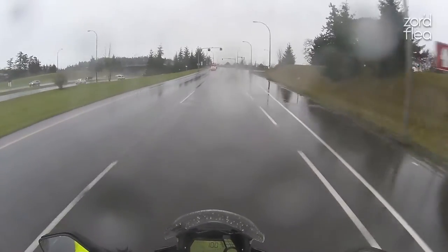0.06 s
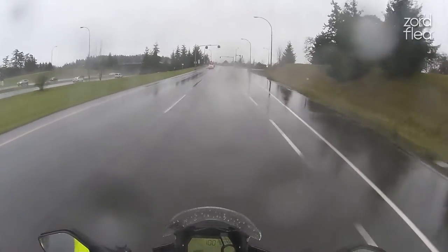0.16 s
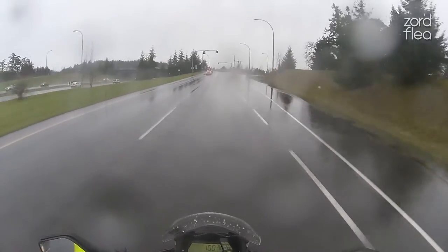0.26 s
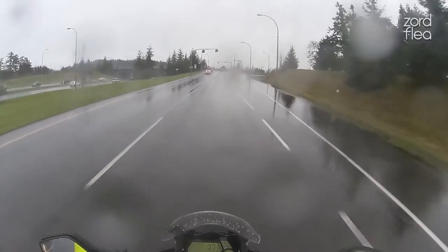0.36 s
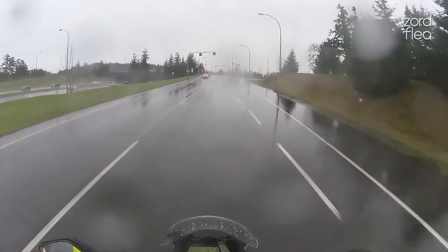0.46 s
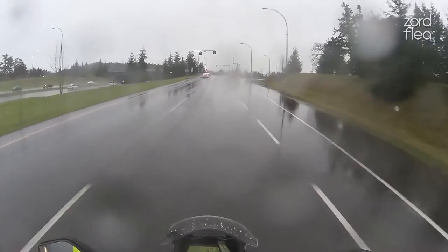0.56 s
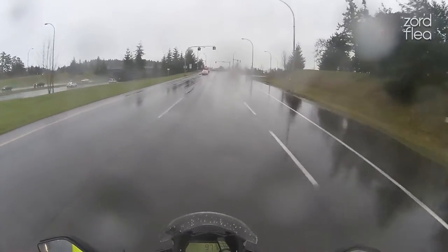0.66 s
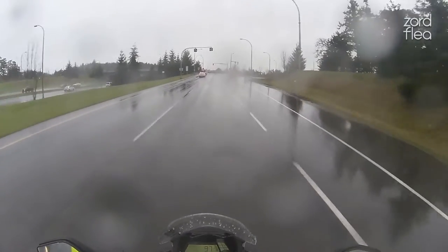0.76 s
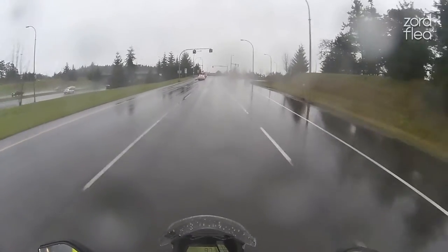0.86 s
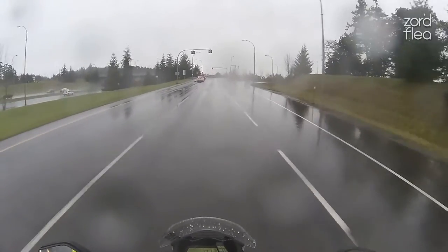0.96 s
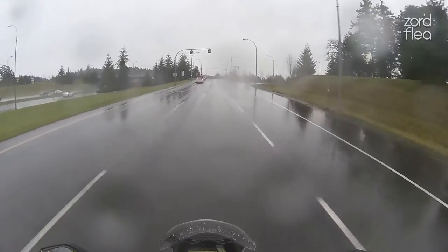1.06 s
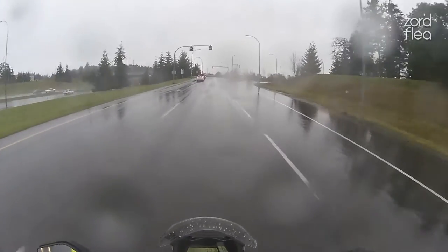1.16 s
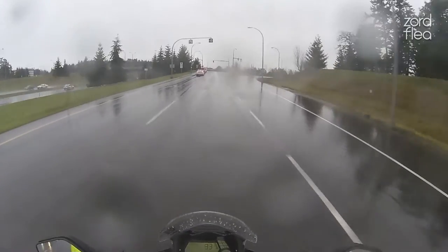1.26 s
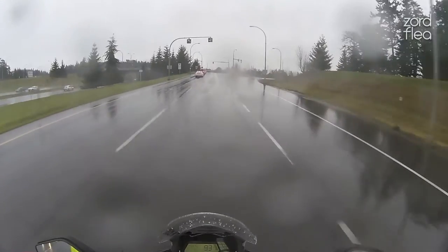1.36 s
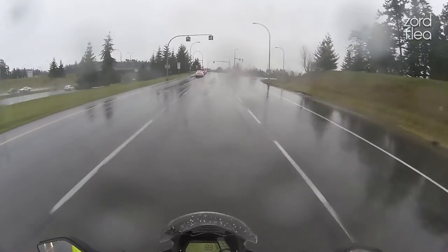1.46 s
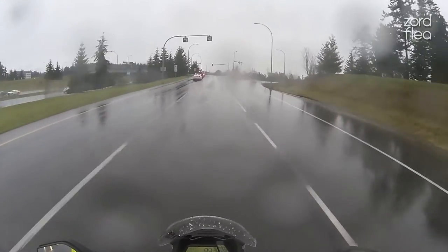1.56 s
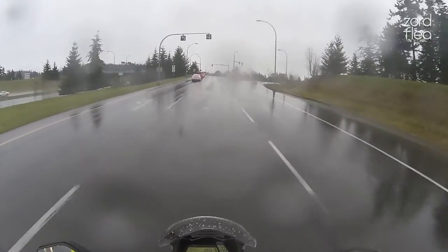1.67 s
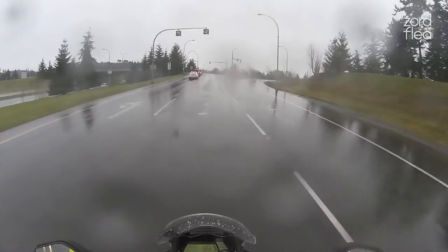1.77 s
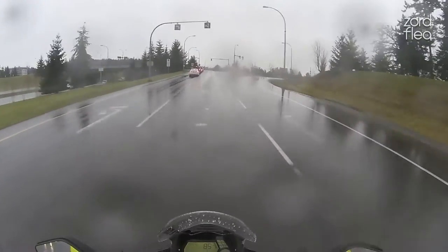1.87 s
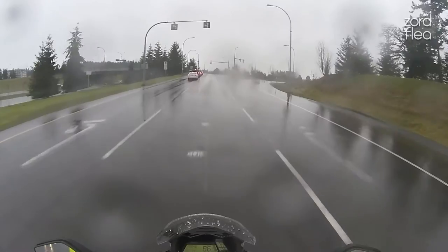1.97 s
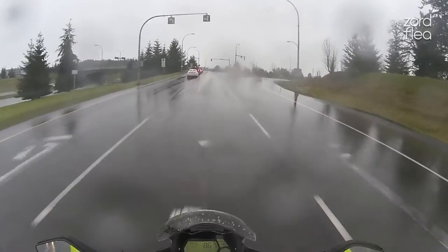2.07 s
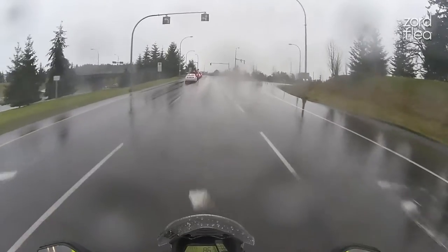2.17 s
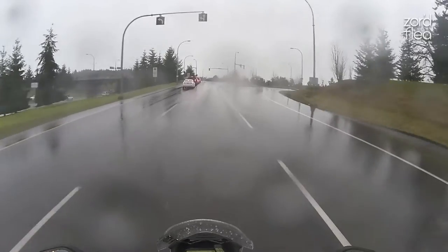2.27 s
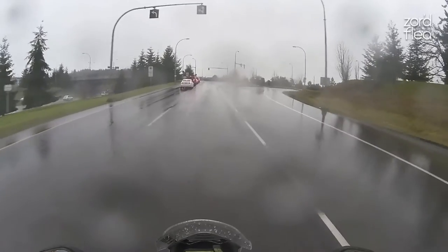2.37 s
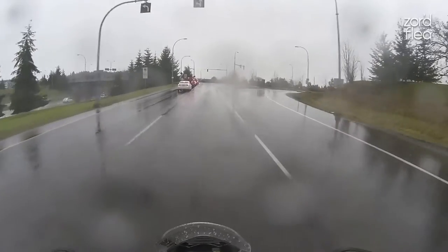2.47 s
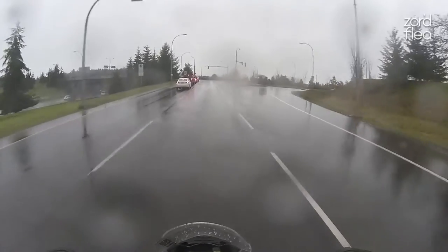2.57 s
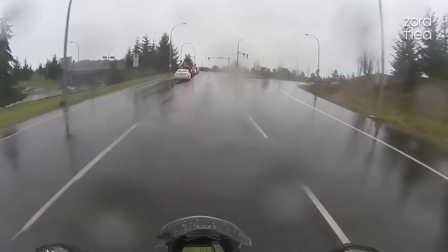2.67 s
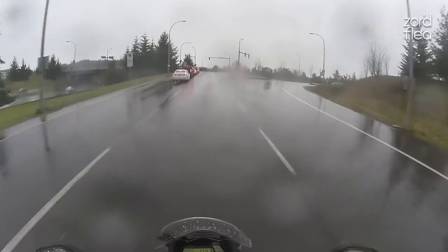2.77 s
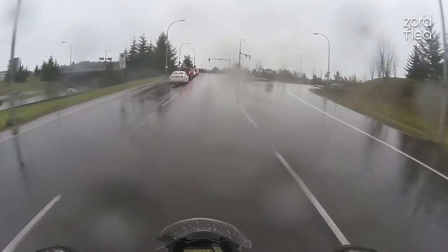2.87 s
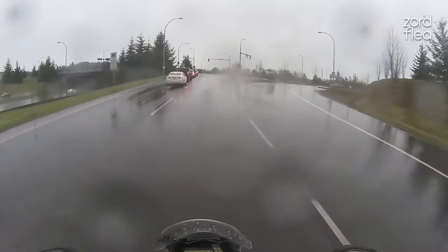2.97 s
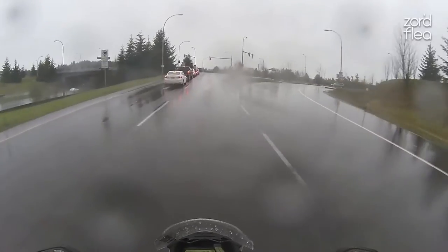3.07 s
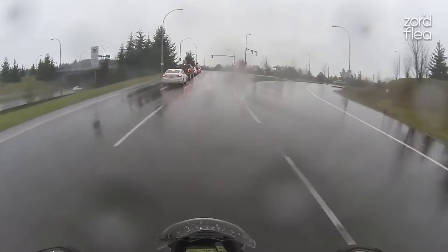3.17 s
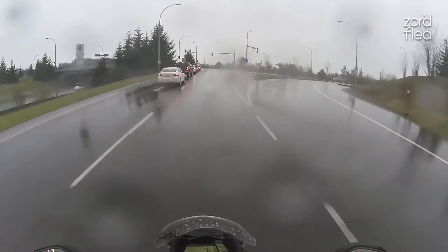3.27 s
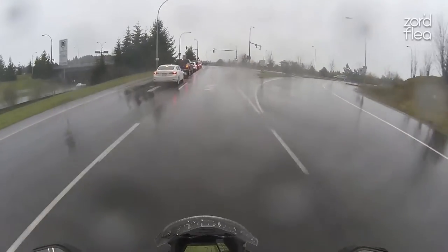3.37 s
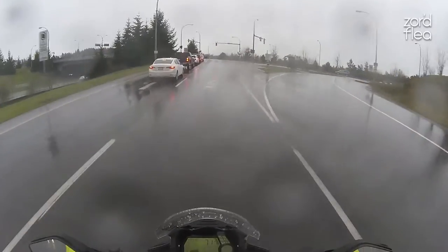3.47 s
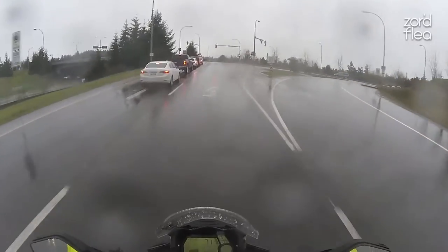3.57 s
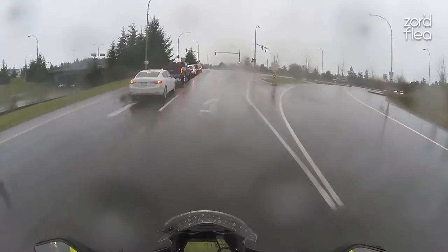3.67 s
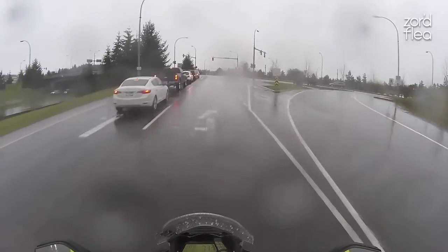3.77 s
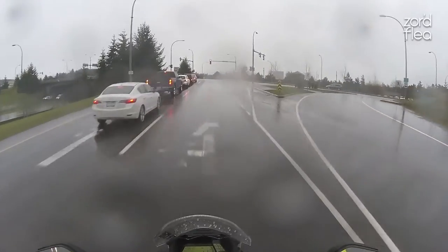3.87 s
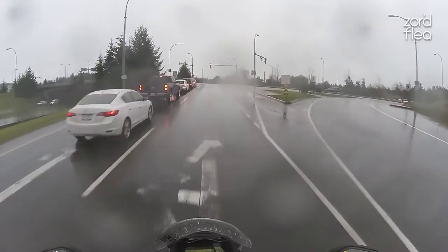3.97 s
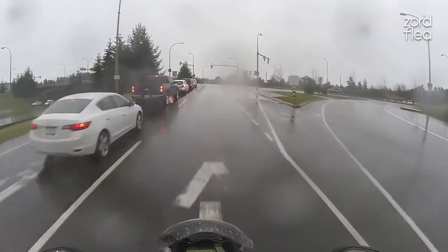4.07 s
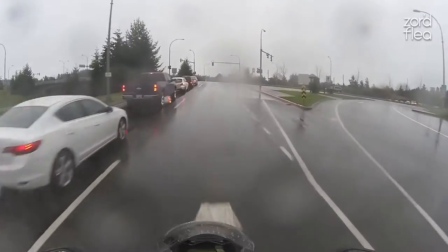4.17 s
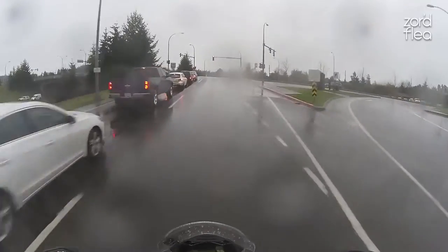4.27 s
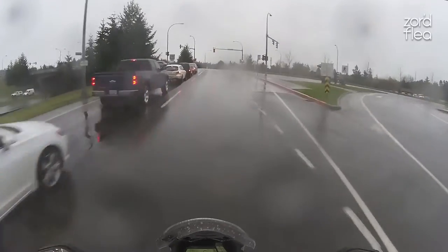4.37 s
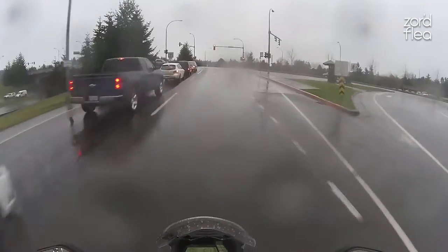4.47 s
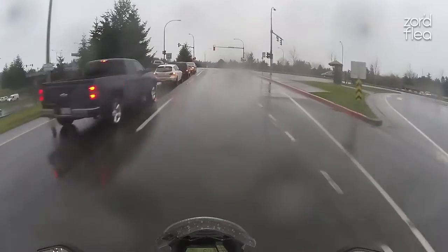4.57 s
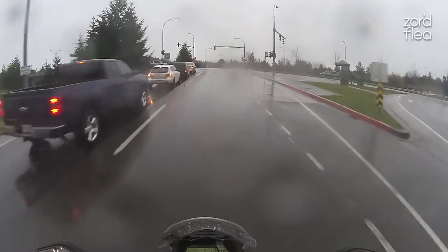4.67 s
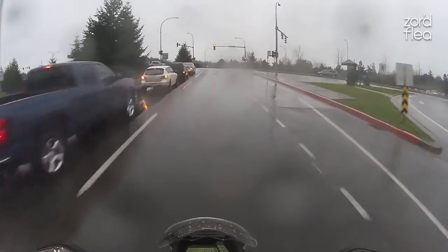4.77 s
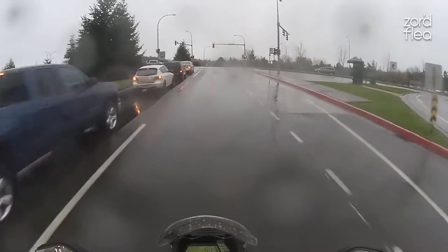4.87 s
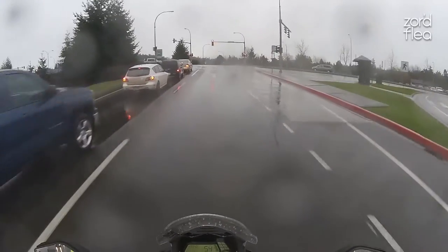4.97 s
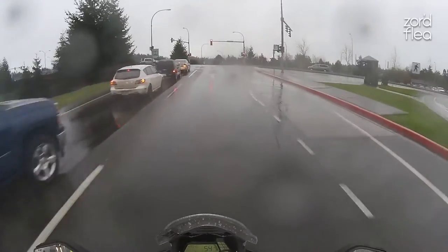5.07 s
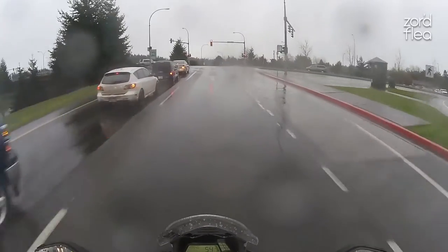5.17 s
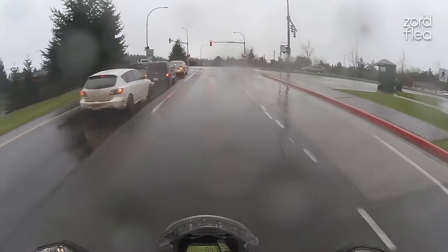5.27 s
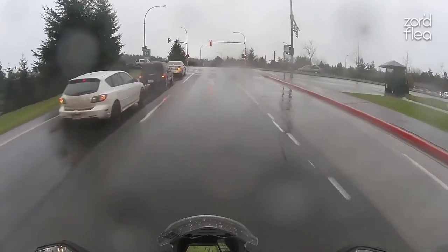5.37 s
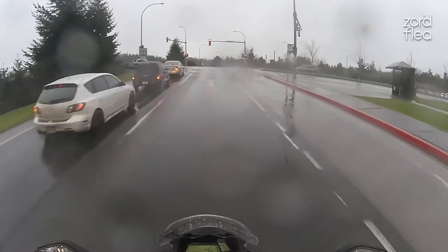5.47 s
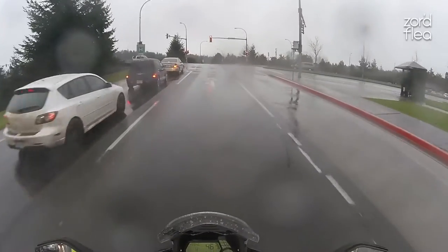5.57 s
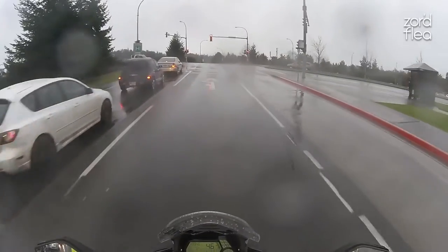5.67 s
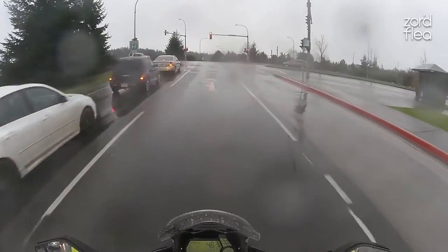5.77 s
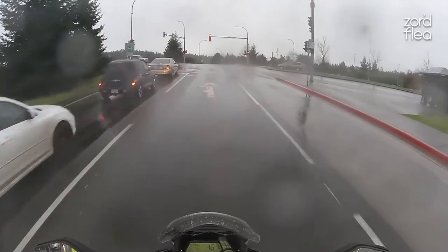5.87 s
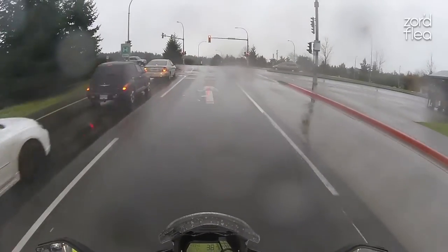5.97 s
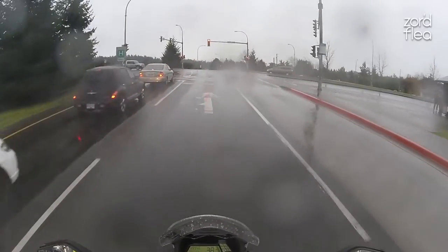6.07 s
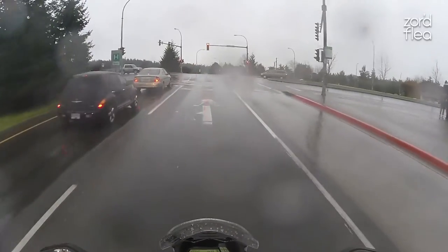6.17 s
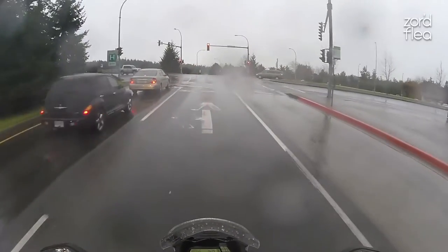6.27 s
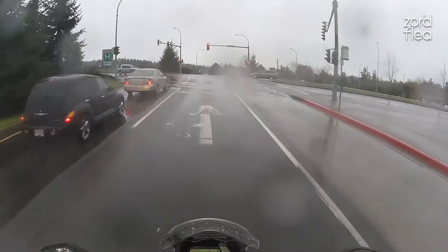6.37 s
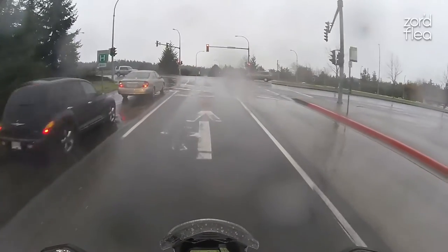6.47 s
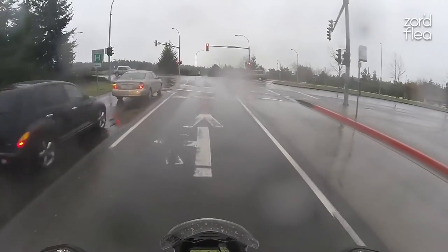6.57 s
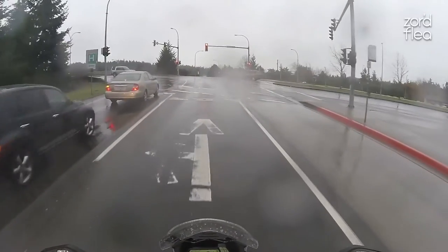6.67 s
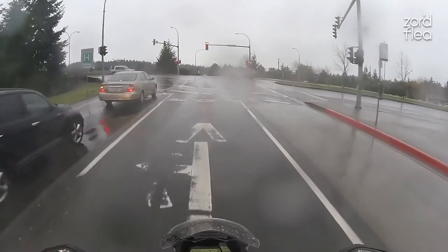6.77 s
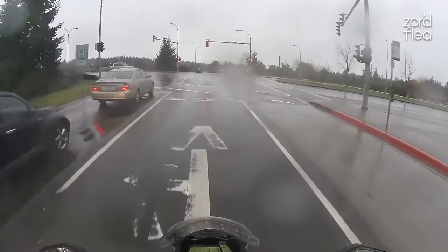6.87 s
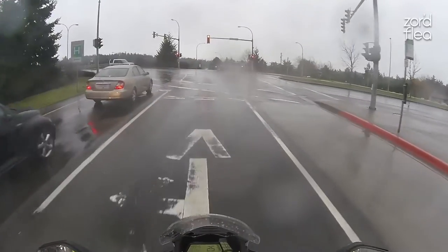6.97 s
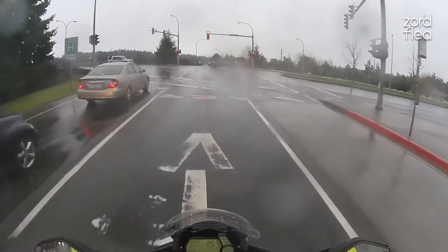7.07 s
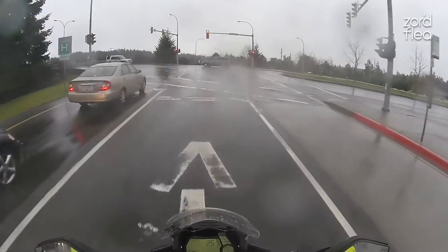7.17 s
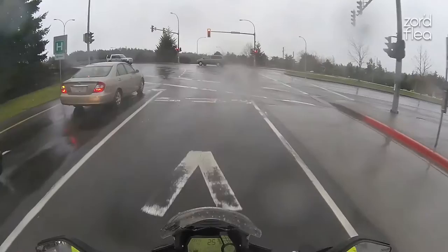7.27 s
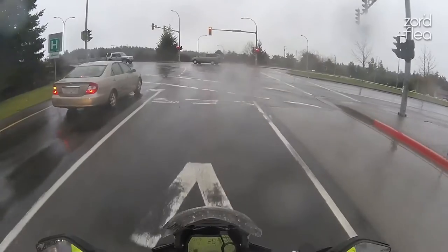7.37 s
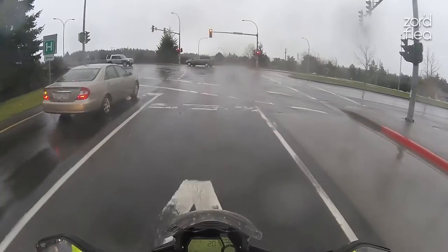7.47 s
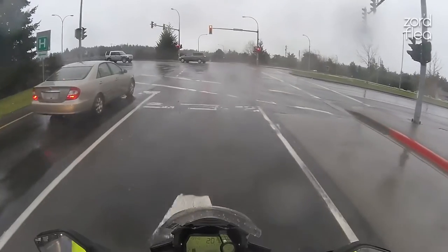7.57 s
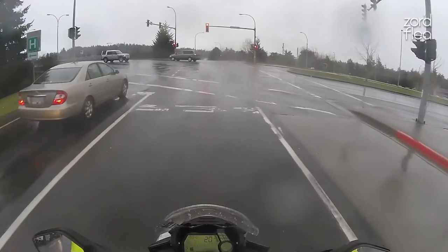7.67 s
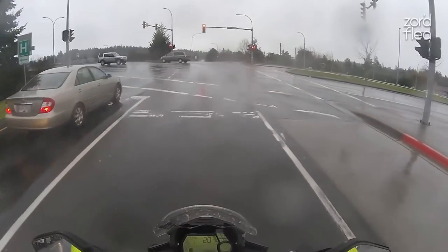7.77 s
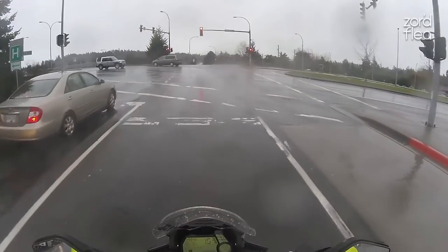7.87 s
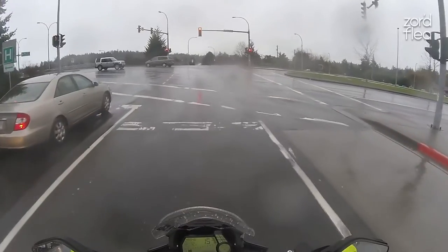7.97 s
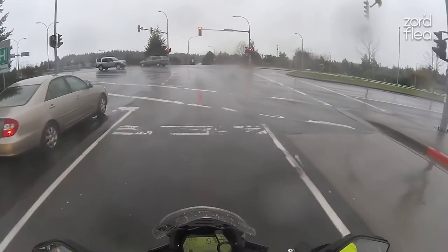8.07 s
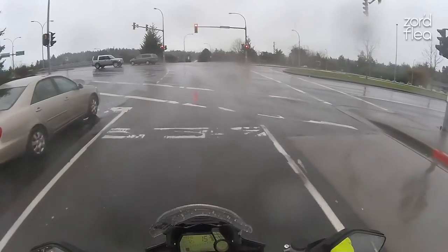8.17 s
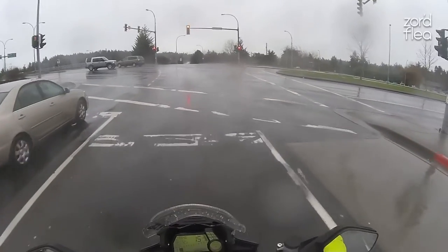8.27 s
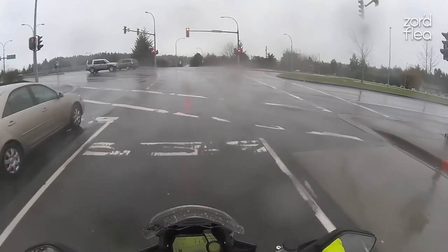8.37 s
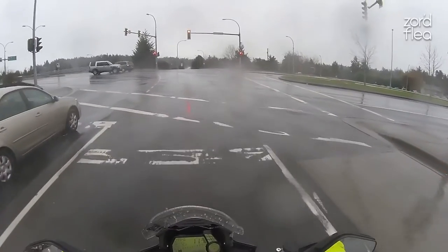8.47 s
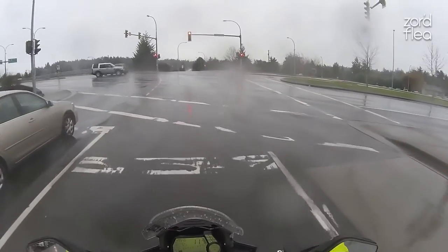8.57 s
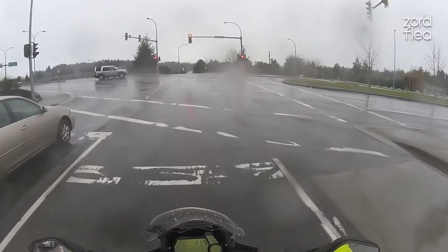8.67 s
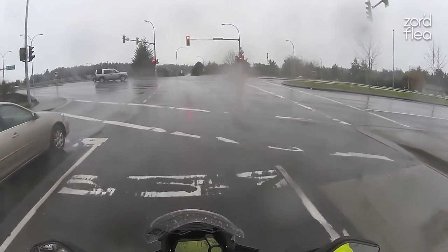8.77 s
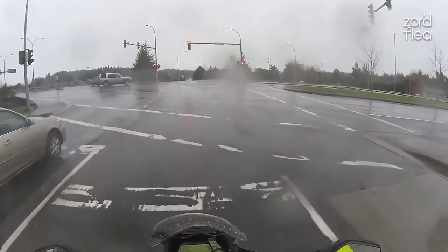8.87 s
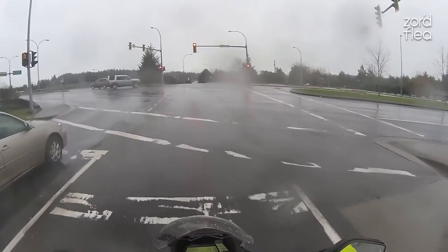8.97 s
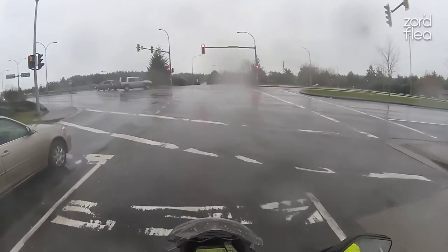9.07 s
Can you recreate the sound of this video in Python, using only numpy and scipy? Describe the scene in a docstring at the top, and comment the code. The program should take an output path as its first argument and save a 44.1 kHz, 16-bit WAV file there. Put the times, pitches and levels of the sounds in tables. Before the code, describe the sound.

An onboard microphone on a motorcycle travelling a wet open highway. From 0 to 2 seconds, wind hits in loud, low, uneven bursts and sharp slaps, over broad tyre roar, hissing spray, a few raindrop ticks and a faint wavering gear whine. The engine drone sinks as the bike slows; a metallic clunk comes at about 2.2 seconds. Around 3.2 seconds the revs step up with a change down, and the brakes hiss faintly near 3, 4.4 and 5 seconds. Low air rumbles beside queued cars from 3.6 to 4.7 seconds, as the main wind eases. After about 6 seconds the drone gives way to separate, heavy, lumpy thumps with valve clatter and ticking over quieter tyre noise. A brief throttle blip comes at 7 seconds, then the slow pulsing idle continues to 9 seconds, with small knocks. A very faint high electronic tone persists throughout.

```python
"""A twin-cylinder motorcycle coasts up to a red light on a wet highway, heard from the rider's camera.
At speed, wind noise bursts and slaps, tyre noise roars and sprays, drops tick and gear tones whine.
Then the exhaust harmonics drone down, the revs step up at a change down, and the brakes hiss as ringing noise.
Last, separate pressure pulses thump at idle over valve noise, with one brief blip of the throttle.
A faint electronic tone whistles throughout."""
import sys
import numpy as np
from scipy import signal
from scipy.fft import rfft, irfft, next_fast_len
from scipy.io import wavfile
from scipy.ndimage import uniform_filter1d

SR = 44100
rng = np.random.default_rng(int(sys.argv[2]) if len(sys.argv) > 2 else 0)


def wav_record(signal):
    """Record a signal, one row per channel, as 16-bit PCM in the file named by sys.argv[1]."""
    frames = np.transpose(np.atleast_2d(signal))
    bounded = np.clip(frames, -1, 1)
    # unit amplitude maps onto the largest positive 16-bit level
    quanta = np.round(bounded * 32767).astype(np.int16)
    wavfile.write(sys.argv[1], SR, quanta)


N = 402191
TIME_S = np.arange(N) / SR

# electronics and top cut
WHISTLE_HZ, SCAN_HZ, TOP_HZ = 9625, 50, 13500

# raindrops on the housing, before colour and final gain: (t/s, relative level/dB)
DROPS = [(.052, -29), (0.253, -36), (.67, -39), (.773, -40), (.858, -40.5), (1.915, -37), (2.104, -42),
         (2.296, -45), (2.545, -42.5), (2.9, -43), (3.08, -42), (3.165, -42), (4.82, -43)]
# housing response: (f/Hz, level/dB)
DROP_COLOUR = [(600, -10), (1800, -4), (4500, 3.5), (9000, -3), (13000, -18.5)]

# road speed: (t/s, v/(m/s))
SPEED = [(0, 23.15), (1.9, 19.07), (3.1, 15.66), (4.2, 15.75), (5.3, 10.36), (6.5, 7.3), (7.3, 6.4),
         (9.12, 5.1)]
CRUISE_M_S = 20
# growth with road speed: (level at CRUISE_M_S/dB, slope/(dB per tenfold speed))
WIND_LAW = (-19, 55)
ROAR_LAW = (-33, 42.9)
SPRAY_LAW = (-50.5, 41.6)

# wind spectrum: (f/Hz, level/dB)
WIND_COLOUR = [(20, -14), (45, -4), (80, -1), (130, 1.5), (190, -1.5), (250, -5), (330, -10), (450, -17),
               (650, -31)]
# gusts on the microphone: (t/s, half length/s, level change/dB)
GUSTS = [(.8, 0.052, 3), (1.8, 0.91, 2.5), (2.92, .08, 3.5), (3.22, 0.049, 5.5), (4.13, 0.21, 3.5),
         (4.66, 0.11, 3)]
# lee of the queue of cars, one row: (t/s, half length/s, level change/dB)
LEE = (4.45, 0.98, -6.5)
# single hard buffets: (t/s, peak level/dB, f/Hz)
BUFFETS = [(.773, -2.5, 153), (.815, -13, 350), (1.486, -7, 200), (2.385, -8, 173), (2.637, -15, 190),
           (4.066, -15, 260)]
FLUTTER_HZ, FLUTTER_DB = 18, -0.13
# slow, heavy eddies beside the cars: (t/s, half length/s, level/dB)
WAKES = [(3.62, 0.13, -28.5), (4.15, 0.17, -26), (4.72, 0.26, -35.5)]
# wake spectrum: (f/Hz, level/dB)
WAKE_COLOUR = [(22, -7), (50, 0.5), (100, -2), (170, -10)]

# tread roar spectra, fast and slow: (f/Hz, level/dB)
ROAR_FAST = [(240, -36.5), (400, -3), (838, -8), (985, -7.5), (1080, -8.5), (1170, -9), (1830, -18),
             (1990, -16), (2620, -31), (2800, -24.5), (3050, -29.5), (3960, -45), (6710, -120)]
ROAR_SLOW = [(210, -11), (350, -1), (455, -10), (498, -3.5), (690, -5.5), (843, -6.5), (983, -3.5),
             (1130, -7), (1240, -4), (1570, -13.5), (1840, -19), (1990, -15), (2350, -30.5), (3050, -44),
             (3960, -43.5), (6710, -120)]
# speeds between which the roar mellows: (fast/(m/s), slow/(m/s))
MELLOW_M_S = (19.9, 15.27)
# spray spectrum: (f/Hz, level/dB)
SPRAY_COLOUR = [(2000, 1.5), (2800, 2), (3300, -2.5), (4400, -2.5), (5100, -8.5), (6100, -11),
                (7000, -14.5), (9400, -16), (11000, -25), (13000, -37.5)]
SPRAY_GRAIN_DB = 1.7
# stretches of deeper water: (t/s, half length/s, spray level change/dB)
PUDDLES = [(0.05, 0.11, 3), (3.48, 0.21, 3), (4.42, 0.17, 1.5), (5.3, 0.3, 1.5)]
PUDDLE_ROAR_SHARE = 0.34

# brake disc resonances: (f/Hz, width/Hz, gain/dB)
DISC = [(6150, 350, -5), (6620, 250, -5), (7370, 700, 0), (8270, 450, -7)]
# squeezes of the brake: (t at the hardest/s, rise/s, fall/s, level/dB)
SQUEEZES = [(2.98, 0.25, 0.54, -66.5), (4.42, 0.17, 0.34, -65.5), (5.1, 0.38, 0.87, -71)]

# knocks of the gear change and drive chain: (t/s, level/dB, decay/s, f/Hz)
CLUNKS = [(2.187, -23, .003, 900), (2.778, -39, .0016, 3500), (4.064, -29.5, .004, 850),
          (4.605, -42, .003, 2000), (5.32, -49, .004, 2800), (5.41, -48.5, .004, 2830),
          (7.031, -41, .012, 1150), (8.249, -43.5, .005, 1300), (8.502, -48.5, .0035, 2800)]
# gear case spectrum: (f/Hz, level/dB)
GEAR_CASE = [(300, -3), (800, 7), (1400, 2), (2200, 5), (3000, -2), (5000, -9)]
# whistling rings in the machinery: (t at the loudest/s, rise/s, fall/s, f/Hz, width/Hz, level/dB)
SINGS = [(3.43, 0.081, 0.25, 1800, 900, -47), (6.42, .16, .3, 1310, 90, -61),
         (6.53, .12, .2, 1684, 80, -59.5), (6.87, .013, .026, 2020, 130, -64),
         (7.0, 0.22, .15, 1530, 70, -63), (7.2, .13, .08, 2010, 130, -66),
         (7.66, 0.096, .12, 1500, 110, -66), (8.38, .15, 0.18, 1570, 130, -61.5)]
# whine of gear pairs: (t at the loudest/s, rise/s, fall/s, meshes per engine cycle/1, level/dB)
WHINES = [(.4, .11, .13, 30, -38), (.67, .11, .16, 30, -36.5), (1.06, .18, .16, 30, -37),
          (1.38, .1, .12, 30, -43), (1.68, .14, .27, 30, -44.5), (.55, .2, .45, 50.3, -50),
          (3.6, .15, .4, 60, -55), (3.52, .1, .2, 65, -51), (4.55, .3, .22, 30.5, -51),
          (5.3, .35, .45, 30.5, -52.5), (5.95, .22, .3, 30.2, -55.5)]

# engine speed: (t/s, four-stroke cycle rate/Hz)
REVS = [(0, 34.8), (.8, 32.9), (2.06, 29.6), (3.16, 25.85), (3.3, 28.7), (3.45, 29.6), (3.65, 29.8),
        (4.26, 27.3), (4.86, 23.35), (5.31, 20.15), (5.9, 16.15), (6.18, 14.5), (6.32, 14.05),
        (6.72, 11.62), (7.7, 11.38), (7.9, 11.92), (8.2, 11.69), (9.12, 11.73)]
# rev rise of the throttle blip, one row: (t at start/s, rise/s, fall/s, extra cycle rate/Hz)
REV_BLIP = (6.998, .05, .333, 5.07)
IDLE_HZ = 11.7
# one firing of the first cylinder; lag of the second as a share of the cycle
FIRING_AT_S, SECOND_LAG_CYCLES = 7.4355, 5 / 8
# clutch lever pulled: (from/s, to/s)
CLUTCH = [(2.86, 3.2), (5.84, 9.12)]
CLUTCH_TRAVEL_S = 0.14

# valve noise: (place/cycle, length/cycle, level at idle/dB, f/Hz)
VALVES = [(.08, .05, -61, 600), (.24, .05, -60, 1600), (.33, .07, -54, 350), (.33, 0.054, -58.5, 653),
          (.44, .04, -51.5, 1000), (.47, 0.052, -54.5, 2000), (.56, .05, -60, 1600),
          (.74, .045, -60.5, 1610), (.82, .05, -50.5, 1050), (.88, 0.084, -59, 2390),
          (.99, 0.043, -56.5, 1400)]
# valve gear spectrum: (f/Hz, level/dB)
CLATTER = [(450, -13), (700, -6), (950, -2), (1150, -5.5), (1270, -1), (1650, -0.5), (1880, -6.5),
           (2500, -14), (2850, -18), (3500, -24), (5000, -31.5), (9000, -54)]
# cam cover resonances: (f/Hz, width/Hz, gain/dB)
COVER = [(1277, 75, 0.5), (1503, 63, 3), (1653, 61, 1), (2780, 200, -11.5)]
COVER_DB = -4
# tappet ticks: (place/cycle, strike level at idle/dB)
TAPPETS = [(.28, -67.5), (.41, -67), (.47, -69), (.73, -63.5), (.84, -65.5)]
# tappet spectrum: (f/Hz, level/dB)
TAPPET_COLOUR = [(2000, 0), (2850, -1), (3200, -9), (3550, -6.5), (4500, -5.5), (5500, -16.5),
                 (8000, -27.5)]
TAPPET_DECAY_S, TAPPET_SCATTER_DB = .0055, 1
# steady whirr and cam chain ticking, at idle; slope of all valve noise with revs
WHIRR_DB, CHAIN_DB, CLATTER_DB_PER_DECADE = -62.5, -72, 6.5

# harmonics of one exhaust pulse: (multiple of the cycle rate/1, relative level/dB)
DRONE = [(2, -8.5), (3, 0), (4, -2), (5, -5.5), (6, -9), (7, -8), (8, -12), (9, -13)]
# exhaust harmonics sliding through a resonance: (multiple of the cycle rate/1, f/Hz, width/Hz, level/dB)
BOOMS = [(10, 265, 25, -42), (11, 250, 100, -39), (13, 228, 40, -49), (14, 250, 48, -42.5),
         (16, 368, 60, -48), (21, 355, 90, -51), (22, 375, 70, -53)]
# swells of the drone: (t/s, half length/s, level change/dB)
ENGINE_BRAKING = [(2.3, .2, 3.5), (2.72, .15, 5), (3.7, .45, 2), (5.45, 0.35, 0)]
# drone level at idle speed, and its slope with revs
DRONE_DB, DRONE_DB_PER_DECADE = -42, 31.5
# place of the first exhaust pulse; size of the second relative to it
EXHAUST_AT_CYCLES, SECOND_SHARE = .75, .7

# air box and pipe resonances: (f/Hz, width/Hz, gain/dB)
AIRBOX = [(124, 25, -9), (253.3, 16.7, -6.5), (279.4, 24.2, -5), (349, 28, -19.5)]
# tailpipe resonance, one row: (f/Hz, width/Hz, gain/dB)
TAILPIPE = (46.8, 10.2, -16.5)
# hard kicks of the second cylinder as idle settles: (t/s, push level/dB)
KICKS = [(6.05, -17), (6.179, -11), (6.317, 0), (6.544, -5), (6.794, -1), (7.067, -12), (7.329, -14),
         (7.758, -7)]
# throttle blip for the last change down, one row: (t/s, push level/dB)
BLIP = (7.0438, 4.5)
# uneven firings: (t/s, half length/s, level change/dB)
UNEVEN = [(7.0, .03, 2.5), (7.2, .03, -10)]
# firing push at idle speed, its softening per extra Hz, and its change while the wheels drive the engine
THUMP_DB, THUMP_DB_PER_HZ, DRIVEN_THUMP_DB = 0.5, 0.25, -14.5
# gain of the second cylinder's idle puff
PUFF_DB = -2


def undb(db):
    """Decibels to gain."""
    return 10 ** (np.asarray(db) / 20)


def unit(x):
    """Scale to rms 1."""
    return x / np.sqrt(np.mean(x ** 2))


def curves(table):
    """Interpolate each column of a table over time."""
    s, *columns = np.transpose(table)
    return [np.interp(TIME_S, s, c) for c in columns]


def colour(x, points):
    """Filter by a (f/Hz, level/dB) outline with steep skirts beyond its ends."""
    hz, db = np.transpose(points)
    size = next_fast_len(N)
    f = np.maximum(np.fft.rfftfreq(size, 1 / SR), 1)
    skirts = np.minimum(f / hz[0], 1) ** 2 * np.minimum(hz[-1] / f, 1) ** 4
    gain = undb(np.interp(np.log(f), np.log(hz), db)) * skirts
    return irfft(rfft(x, size) * gain, size)[:N]


def noise(points):
    """Noise of a given colour, rms 1."""
    return unit(colour(rng.standard_normal(N), points))


def ring(x, modes):
    """Sum of resonances (f/Hz, width/Hz, gain/dB)."""
    return sum(undb(db) * signal.lfilter(*signal.iirpeak(hz, hz / width, fs=SR), x)
               for hz, width, db in modes)


def band(x, hz, width):
    """One resonance applied twice for steep sides, rms 1."""
    mode = [(hz, width, 0)]
    return unit(ring(ring(x, mode), mode))


def walk(rate_hz):
    """Smooth random wandering with spread near 1."""
    k = int(SR / rate_hz)
    steps = np.repeat(rng.standard_normal(N // k + 1), k)
    return 1.3 * uniform_filter1d(uniform_filter1d(steps, k), k)[:N]


def impulses(times_s, sizes):
    """One-sample pushes at the given times."""
    at = np.round(np.asarray(times_s) * SR).astype(int)
    return np.bincount(np.clip(at, 0, N - 1), sizes, N)


def held(start_s, length_s, ramp_s):
    """Ramp from 0 to 1 at the start and back once the length is over."""
    rise = np.clip((TIME_S - start_s) / ramp_s, 0, 1)
    return rise - np.clip((TIME_S - start_s - length_s) / ramp_s, 0, 1)


def arch(s, rise_s, fall_s):
    """Swell smoothly to 1 at a moment and fade again."""
    return np.exp(-((TIME_S - s) / np.where(TIME_S < s, rise_s, fall_s)) ** 2)


def swells(rows):
    """Smooth level changes (t/s, half length/s, level change/dB), summed in dB."""
    return sum(db * np.exp(-((TIME_S - s) / half) ** 2) for s, half, db in rows)


def by_speed(law):
    """Level in dB of a sound that grows as a power of road speed."""
    cruise_db, db_per_decade = law
    return cruise_db + db_per_decade * np.log10(curves(SPEED)[0] / CRUISE_M_S)


def electronics():
    """A faint tone that pauses once in every sensor scan, over microphone hiss."""
    running = uniform_filter1d(1. * (TIME_S * SCAN_HZ % 1 > .17), size=30)
    hiss = noise([(200, -12.5), (5000, -3.5), (9500, -1.0), (11000, -7.0), (13000, -11.0)])
    return undb(-70.5) * running * np.sin(2 * np.pi * WHISTLE_HZ * TIME_S) + undb(-91) * hiss


def rain(count=30):
    """Drops strike the housing as coloured impulses; extra small ones fall in the first 6 s, weakening."""
    s, db = np.transpose(DROPS)
    when, size = rng.random((count, 2)).T
    small = impulses(6 * when, undb(db.mean() - 3 - 10 * size - 10 * when))
    return undb(13.5) * colour(impulses(s, undb(db)) + small, DROP_COLOUR)


def wind():
    """Eddies hit the microphone as uneven bursts of low noise, a few as single hard slaps."""
    wind_db = by_speed(WIND_LAW) + swells(GUSTS) + swells([LEE]) + FLUTTER_DB * walk(FLUTTER_HZ)
    bursts = rng.standard_normal(N) * undb(2.58 * walk(90))
    eddies = unit(colour(bursts, WIND_COLOUR))
    # airflow sets the strength over 0.1 s and longer
    eddies /= np.sqrt(uniform_filter1d(eddies ** 2, size=SR // 10))
    out = undb(wind_db) * eddies
    for s, db, hz in BUFFETS:
        swing = np.pi * hz * (TIME_S - s)
        out = out + undb(db) * (1 - 2 * swing ** 2) * np.exp(-swing ** 2)
    return out


def wakes():
    """Disturbed air beside the cars rumbles as swells of low noise."""
    eddies = noise(WAKE_COLOUR)
    eddies /= np.sqrt(uniform_filter1d(eddies ** 2, size=SR // 6))
    return sum(undb(db) * arch(s, half, half) for s, half, db in WAKES) * eddies


def tyres():
    """Tread roar mellows with falling speed; fine droplets make a grainy spray hiss."""
    water_db = swells(PUDDLES)
    roar_db = by_speed(ROAR_LAW) + PUDDLE_ROAR_SHARE * water_db
    spray_db = by_speed(SPRAY_LAW) + water_db
    fast_m_s, slow_m_s = MELLOW_M_S
    slow = np.clip((fast_m_s - curves(SPEED)[0]) / (fast_m_s - slow_m_s), 0, 1)
    roar = np.sqrt(1 - slow) * noise(ROAR_FAST) + np.sqrt(slow) * noise(ROAR_SLOW)
    droplets = rng.standard_normal(N) * undb(SPRAY_GRAIN_DB * rng.exponential(size=N))
    spray = unit(colour(droplets, SPRAY_COLOUR))
    # the film of water varies along the road
    film_db = 1.0 * walk(70)
    return undb(roar_db + film_db + 0.18 * walk(45)) * roar + undb(spray_db + film_db) * spray


def brakes():
    """Wet pads excite the disc resonances with noise that follows each squeeze."""
    rub = ring(ring(rng.standard_normal(N), DISC), DISC)
    pressure = sum(arch(s, rise, fall) * undb(db) for s, rise, fall, db in SQUEEZES)
    return pressure * undb(.8 * walk(8.3)) * unit(rub)


def crank():
    """Engine cycles per second, and the running count of cycles."""
    s, rise, fall, extra_hz = REV_BLIP
    rev_hz = curves(REVS)[0] + np.interp(TIME_S, [s, s + rise, s + rise + fall], [0, extra_hz, 0])
    turn = np.cumsum(rev_hz) / SR
    return rev_hz, turn - np.interp(FIRING_AT_S, TIME_S, turn)


def gearbox():
    """Metal knocks as decaying bands of noise; the machinery whistles in swelling noise bands."""
    metal = noise(GEAR_CASE)
    knocks = 0
    for s, db, decay, hz in CLUNKS:
        fade = (TIME_S > s) * np.exp(-np.abs(TIME_S - s) / decay)
        knocks = knocks + undb(db) * uniform_filter1d(fade, size=30) * band(metal, hz, hz)
    rub = rng.standard_normal(N)
    rings = sum(undb(db) * arch(s, rise, fall) * band(rub, hz, width)
                for s, rise, fall, hz, width, db in SINGS)
    return knocks + rings


def whine(waver_db):
    """Meshing teeth sing wavering sines at fixed multiples of the engine's cycle rate."""
    rev_hz, _ = crank()
    turn = np.cumsum(rev_hz * (1 + .0012 * walk(30))) / SR
    tones = sum(arch(s, rise, fall) * undb(db) * np.sin(2 * np.pi * meshes * turn)
                for s, rise, fall, meshes, db in WHINES)
    return np.sqrt(2) * undb(waver_db * walk(6.7)) * tones


def firings(turn, scatter_db):
    """One push of uneven size each time the cycle count passes a whole number."""
    at_s = np.flatnonzero(np.diff(np.floor(turn))) / SR
    return impulses(at_s, undb(scatter_db * rng.standard_normal(len(at_s))))


def tappets(turn):
    """Each tappet snaps shut once a cycle with uneven force, as a decaying tick of noise."""
    strikes = sum(undb(db) * firings(turn - place, scatter_db=TAPPET_SCATTER_DB)
                  for place, db in TAPPETS)
    decay = np.exp(-1 / (TAPPET_DECAY_S * SR))
    return signal.lfilter([1], [1, -decay], strikes) * noise(TAPPET_COLOUR)


def valve_metal():
    """Valve gear noise, with the cam cover ringing under it."""
    return noise(CLATTER) + undb(COVER_DB) * unit(ring(rng.standard_normal(N), COVER))


def clatter(turn):
    """Valve gear: chuffs and tappet ticks in every cycle, over a whirr and even cam chain ticking."""
    chuff = valve_metal()
    valves = 0
    for place, length, db, hz in VALVES:
        stroke = np.exp(-(((turn - place + .5) % 1 - .5) / length) ** 2)
        valves = valves + undb(db) * stroke * band(chuff, hz, hz)
    links = np.cos(np.pi * 19 * turn) ** 4  # 19 ticks per cycle
    steady = (undb(CHAIN_DB) * links + undb(WHIRR_DB)) * valve_metal()
    return undb(0.44 * walk(25)) * (valves + tappets(turn) + steady)


def exhaust_pulse(turn, place):
    """One rounded exhaust pulse per cycle, as a sum of harmonics."""
    return -sum(undb(db) * np.cos(2 * np.pi * k * (turn - place)) for k, db in DRONE)


def drone(turn, rev_hz, drone_db):
    """Two unevenly spaced exhaust pulses a cycle; higher harmonics swell through resonances."""
    first = exhaust_pulse(turn, EXHAUST_AT_CYCLES)
    second = exhaust_pulse(turn, EXHAUST_AT_CYCLES + SECOND_LAG_CYCLES)
    low = (first + SECOND_SHARE * second) * undb(1.4 * walk(40))
    boom = 0
    for k, hz, width, db in BOOMS:
        resonance = 1 / np.hypot(1, 2 * (k * rev_hz - hz) / width) ** 4
        boom = boom - undb(db) * np.sin(2 * np.pi * k * turn) * resonance
    return undb(drone_db) * unit(low) + np.sqrt(2) * undb(0.84 * walk(30)) * boom


def gulp(pushes, build_s, cut_s):
    """Pressure builds while a valve is open and drops as it shuts; the air box and pipe ring on."""
    t = np.arange(-SR // 20, SR // 20) / SR
    shape = np.exp(np.minimum(t, 0) / build_s) * (1 - np.tanh(t / cut_s)) / 2
    pressure = signal.fftconvolve(pushes, shape, "same")
    return ring(pressure, AIRBOX) - ring(pressure, [TAILPIPE])


def engine():
    """Two cylinders on a 270 degree crank: a drone while the wheels drive them, thumps at idle."""
    rev_hz, turn = crank()
    second_turn = turn - SECOND_LAG_CYCLES
    driven = 1 - sum(held(start, end - start, CLUTCH_TRAVEL_S) for start, end in CLUTCH)
    rev_decades = np.log10(rev_hz / IDLE_HZ)
    thump_db = THUMP_DB - THUMP_DB_PER_HZ * (rev_hz - IDLE_HZ) + swells(UNEVEN)
    thump_db = thump_db + DRIVEN_THUMP_DB * driven
    drone_db = DRONE_DB + DRONE_DB_PER_DECADE * rev_decades + swells(ENGINE_BRAKING)
    # the second cylinder thumps like the first only while the wheels drive the engine
    pushes = firings(turn, scatter_db=-0.4) + driven * firings(second_turn, scatter_db=-1.0)
    kick_s, kick_db = np.transpose(KICKS)
    kicks = impulses(kick_s, undb(kick_db))
    thumps = gulp(pushes * undb(thump_db) + kicks, build_s=0.0014, cut_s=0.0012)
    # an opened throttle makes a sharper gulp
    blip = gulp(impulses([BLIP[0]], [undb(BLIP[1])]), build_s=0.00062, cut_s=0.00034)
    # at idle the second cylinder mostly gives a soft, irregular puff
    soft = gulp(firings(second_turn, scatter_db=4.5), build_s=0.0055, cut_s=0.007)
    puffs = undb(PUFF_DB) * (1 - driven) * soft
    valve_gear = undb(CLATTER_DB_PER_DECADE * rev_decades) * clatter(turn)
    return driven * drone(turn, rev_hz, drone_db) + thumps + blip + puffs + valve_gear


def scene():
    """Sum of all sources at the one microphone."""
    background = electronics() + rain() + wind() + wakes()
    bike = tyres() + brakes() + gearbox() + whine(waver_db=0.2) + engine()
    return (background + bike)[None]


def record(dry):
    """The camera cuts the top with a steep low-pass."""
    return signal.sosfilt(signal.ellip(8, .2, 70, TOP_HZ, fs=SR, output="sos"), dry)


dry = scene()
out = record(dry)
wav_record(out)
```